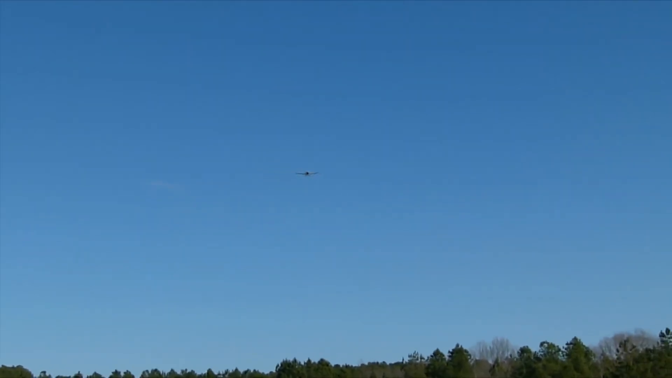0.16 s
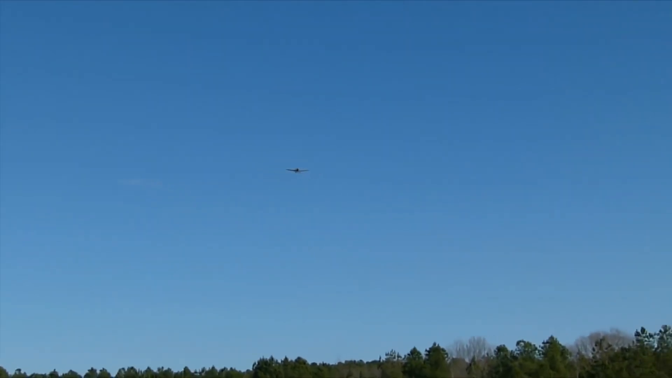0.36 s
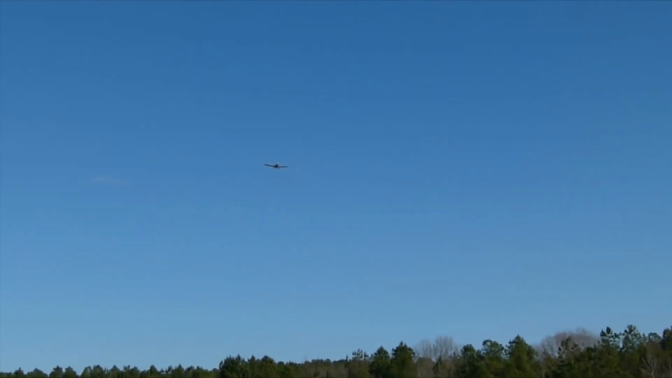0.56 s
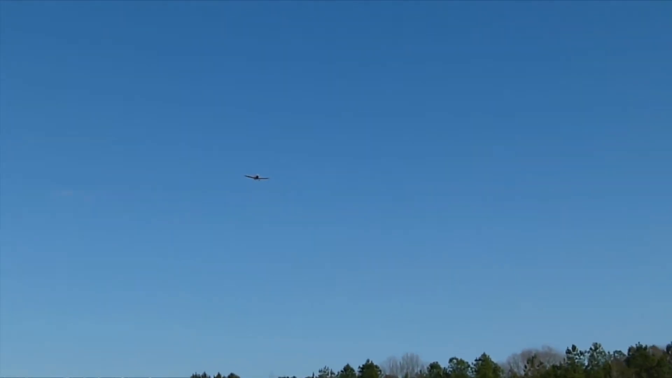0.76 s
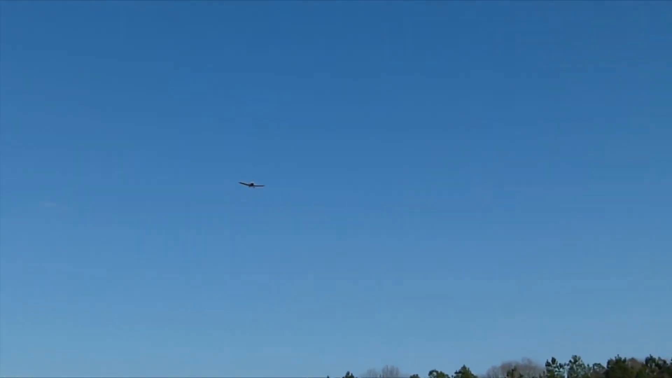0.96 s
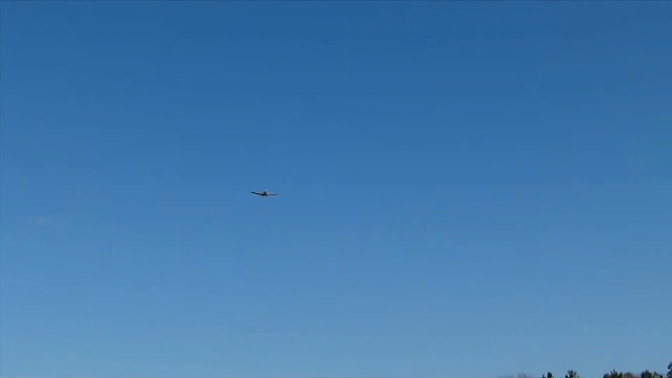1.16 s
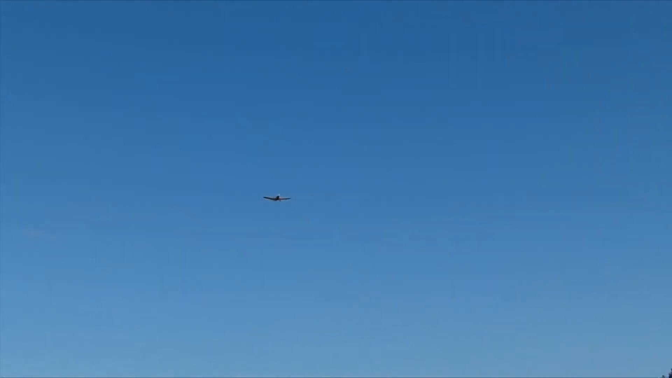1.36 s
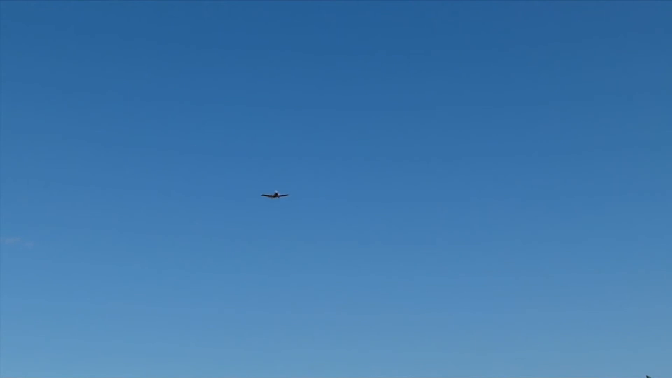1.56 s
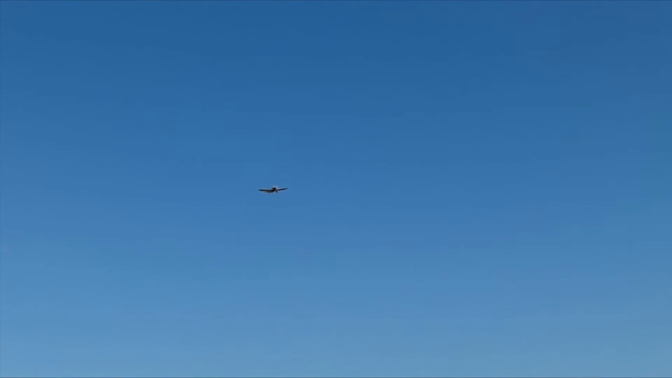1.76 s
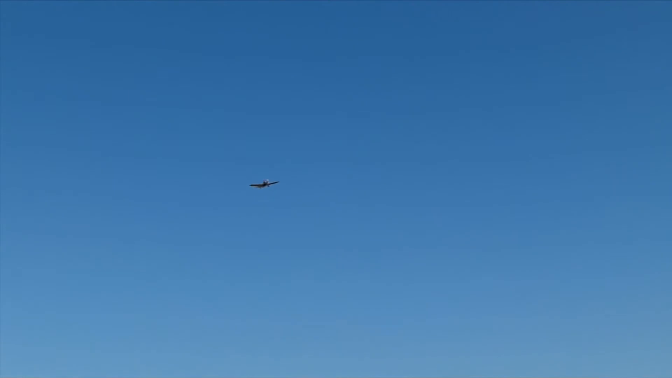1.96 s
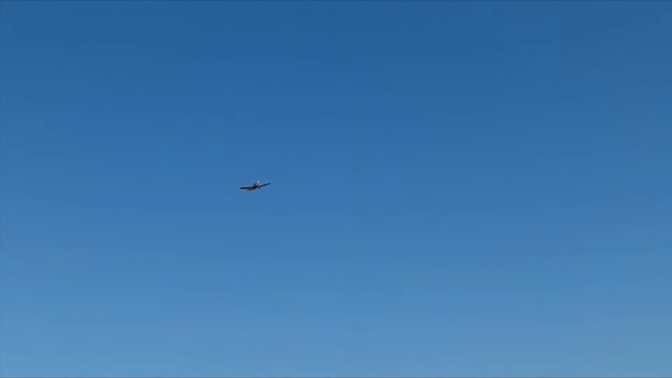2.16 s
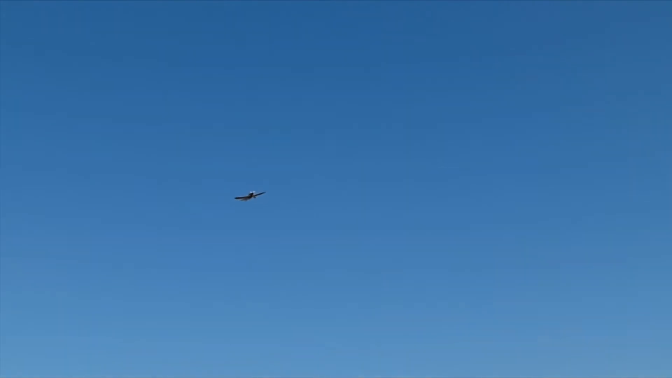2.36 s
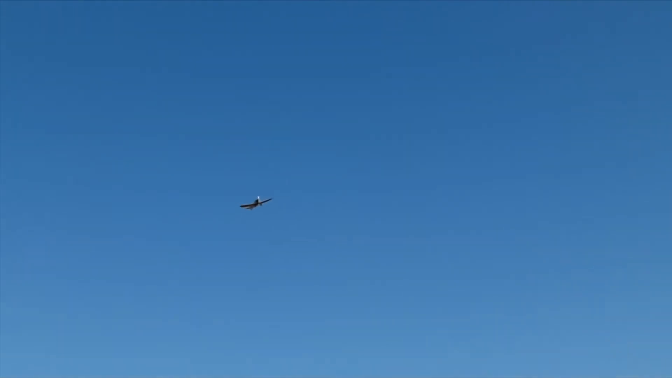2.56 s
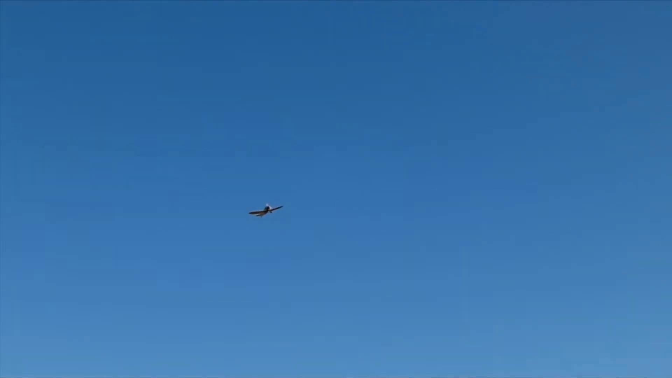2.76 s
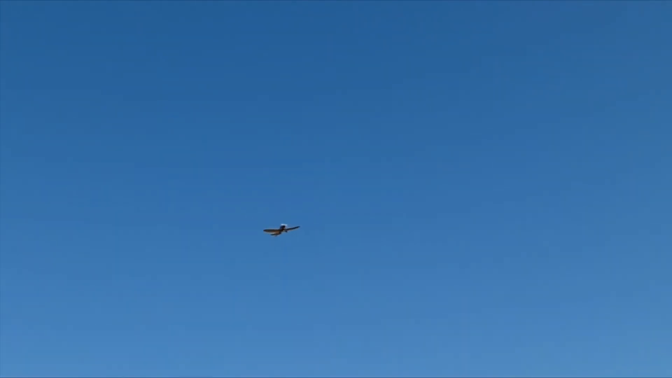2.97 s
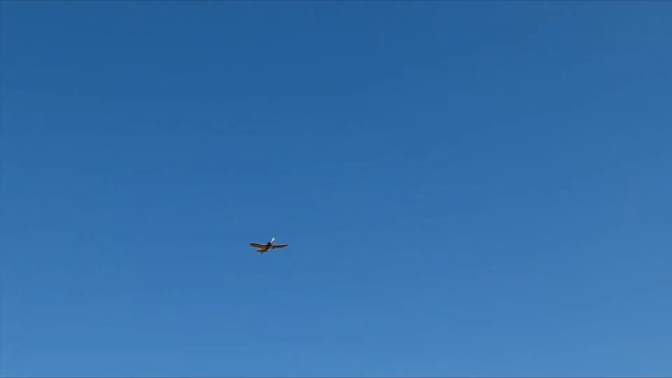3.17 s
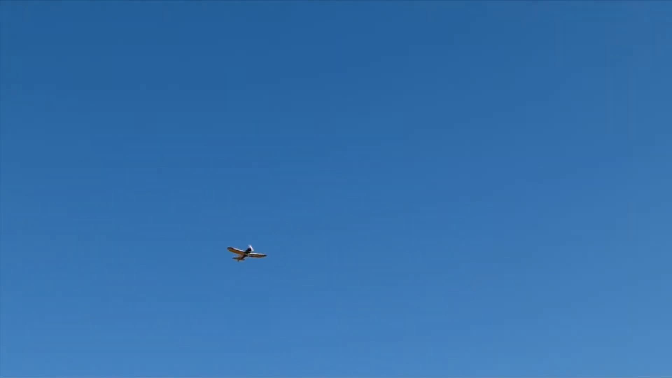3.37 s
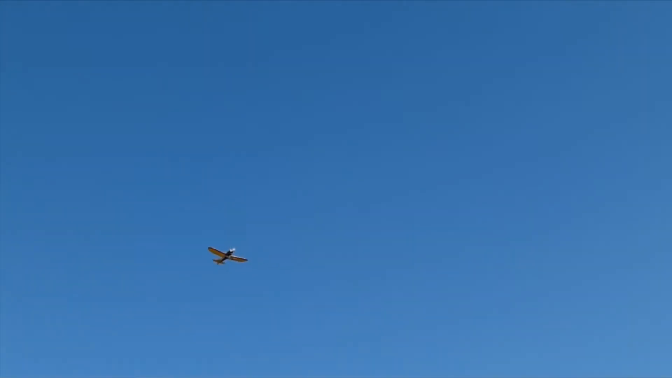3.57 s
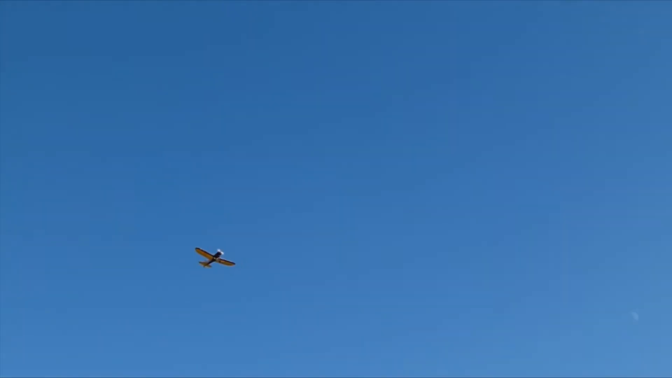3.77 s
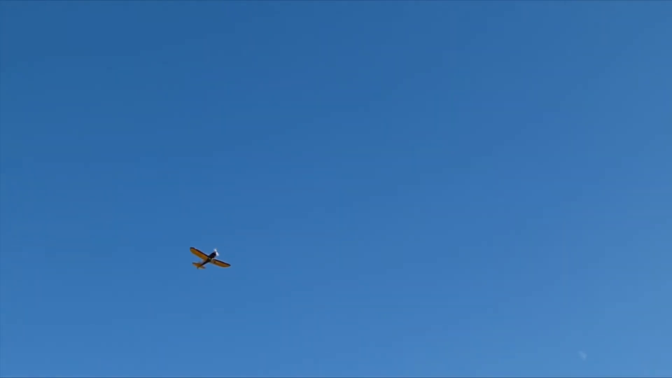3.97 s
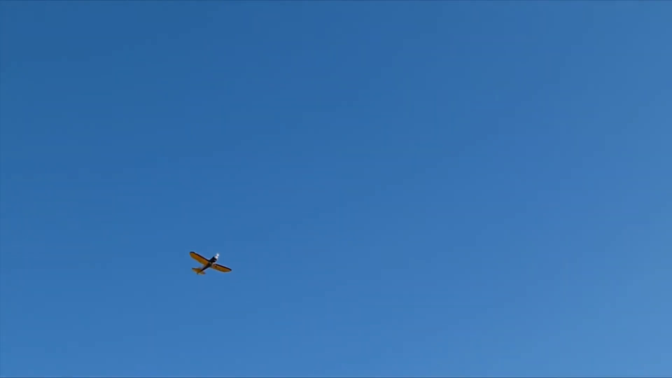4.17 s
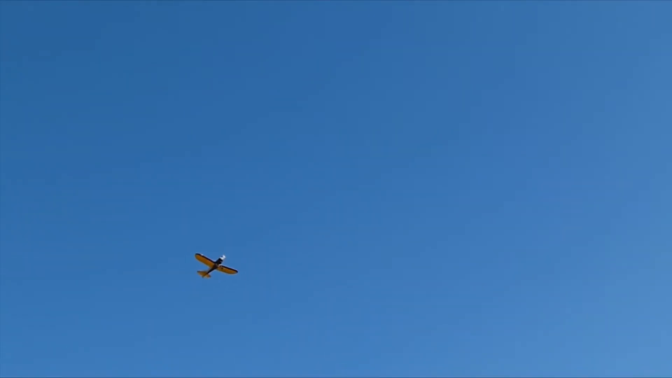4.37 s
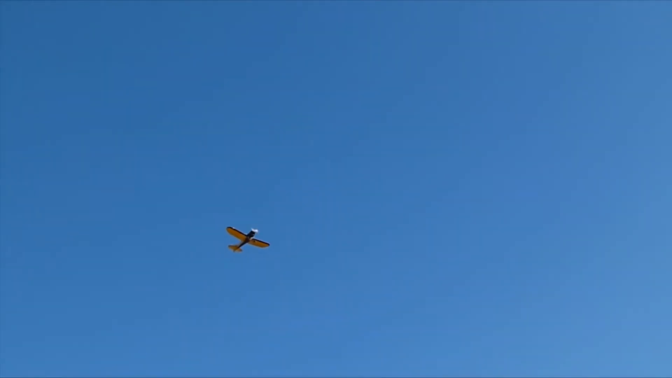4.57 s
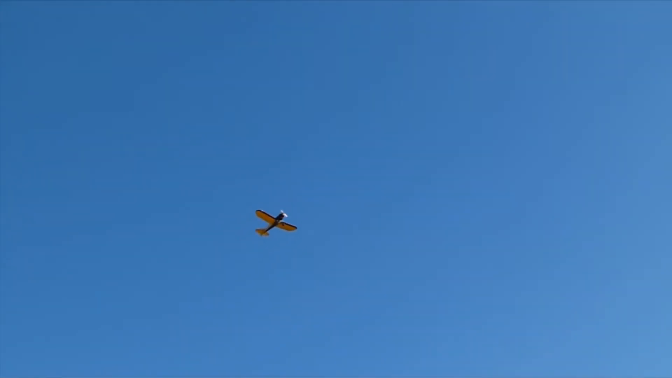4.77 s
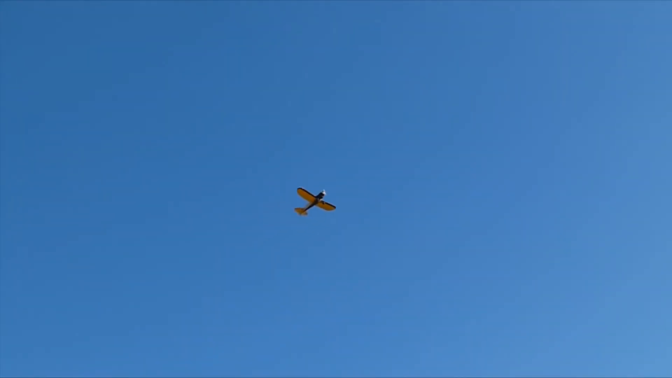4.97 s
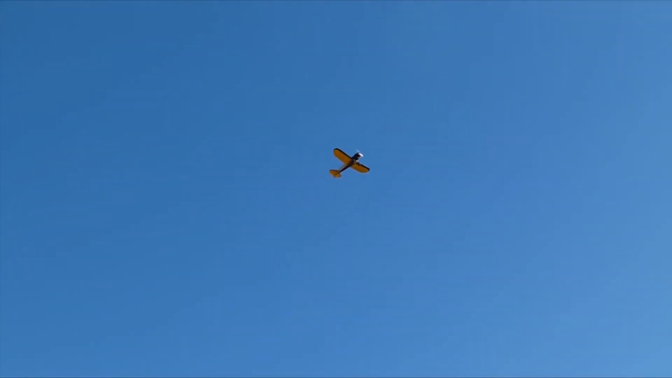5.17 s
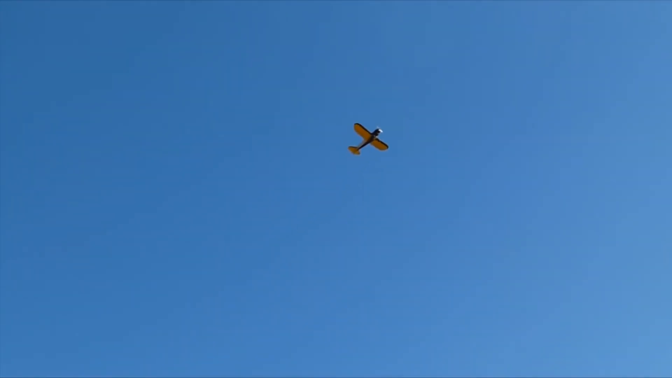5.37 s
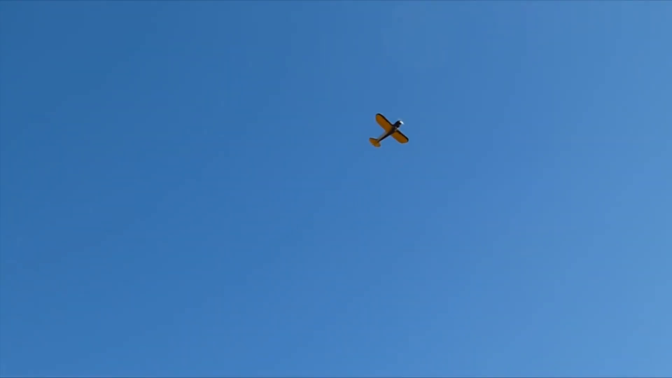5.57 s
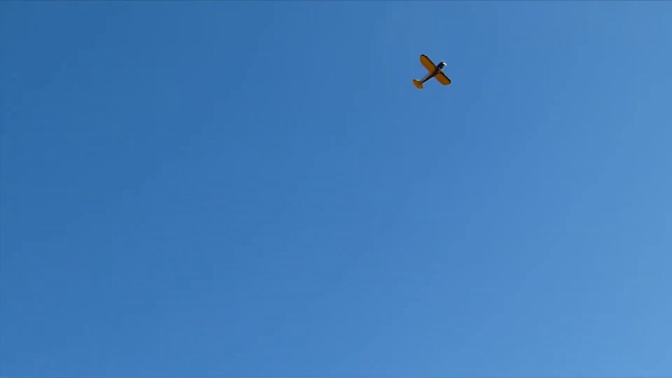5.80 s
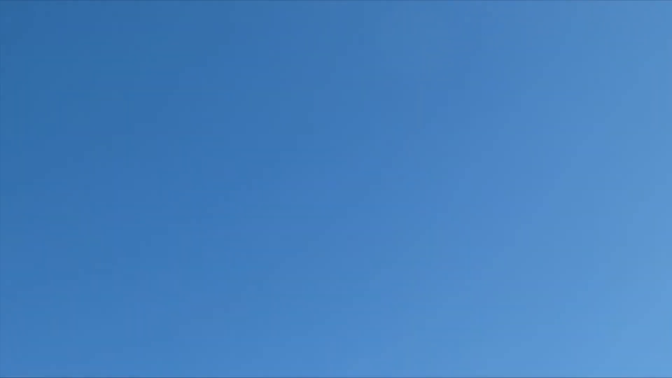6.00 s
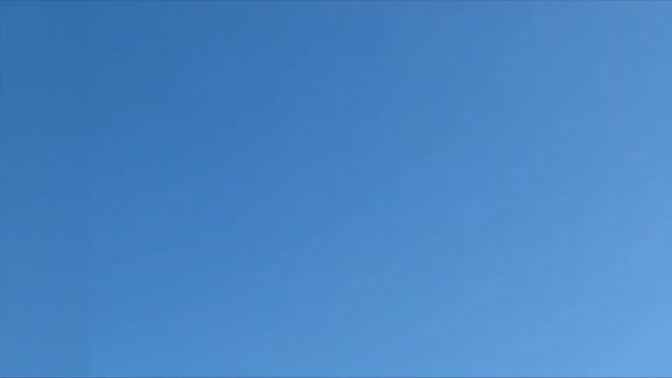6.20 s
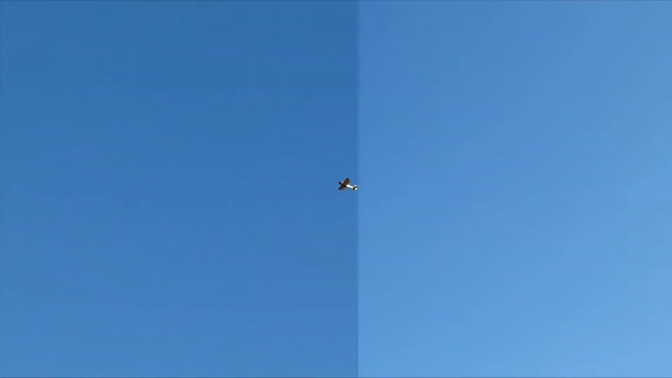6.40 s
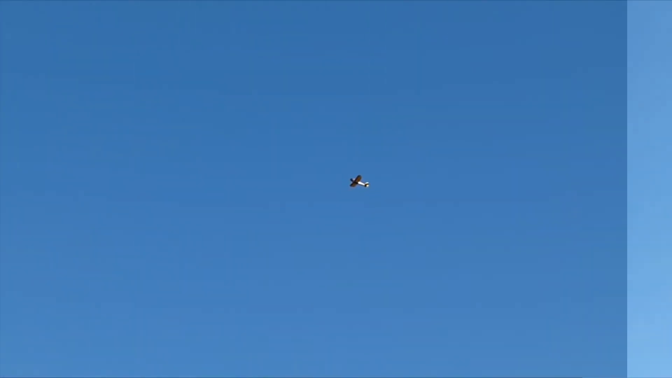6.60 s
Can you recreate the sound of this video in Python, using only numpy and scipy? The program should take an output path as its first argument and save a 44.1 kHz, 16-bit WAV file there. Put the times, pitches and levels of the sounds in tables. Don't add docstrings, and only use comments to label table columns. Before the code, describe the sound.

A model plane's small petrol engine buzzes continuously under open sky, growing from a thin far drone to a loud raspy one. Its tone wavers as direct sound and ground reflection mix. Tiny shell clicks appear before the middle, a gust thumps around five seconds, and the engine drops in pitch as it passes above. Several rough hand knocks end the take, close on the camera's stereo microphones.

```python
import sys
import numpy as np
from scipy import signal
from scipy.fft import rfft, irfft, next_fast_len
from scipy.io import wavfile
from scipy.ndimage import uniform_filter1d

SR = 44100
rng = np.random.default_rng(int(sys.argv[2]) if len(sys.argv) > 2 else 0)


def how_loud(loudness_db):
    steps = np.asarray(loudness_db, float) / 20
    return 10 ** steps


def wrap_up_sound(samples):
    columns = np.atleast_2d(samples).T
    tamed = np.clip(columns, -1, 1)
    steps = np.round(tamed * 32767).astype(np.int16)
    wavfile.write(sys.argv[1], SR, steps)


N = 292823
CONTROL = 64
SIDES = np.array([[0.5], [-0.5]])

# time_s, firings_hz
FIRING_RATE = [(0.0, 113.4), (0.4, 113.9), (0.85, 115.6), (1.15, 114.3), (1.45, 116), (1.75, 117.6),
               (2.05, 118), (2.45, 117.3), (2.8, 114.6), (3.2, 113.8), (4.0, 114.1), (4.3, 113.2),
               (4.62, 113.1), (5.05, 111.3), (5.22, 111.4), (5.5, 108.8), (6.1, 105.2), (6.64, 102.2)]
# time_s, low_orders_db
NEARNESS = [(0.0, -33.5), (0.26, -32), (0.44, -28.5), (1.1, -27.5), (1.4, -25.5), (2.05, -27), (2.6, -22),
            (2.9, -22), (3.09, -20), (3.73, -23.5), (3.93, -20.5), (4.18, -21), (4.28, -18.5),
            (4.97, -16.5), (5.03, -20), (5.38, -18), (5.95, -16.5), (6.64, -20)]
# time_s, left_right_db
BEARING = [(0, -0.5), (1, -0.4), (3.2, 0), (4.5, 0), (6.64, 0.1)]
START_TURNS = 0.2
FLUTTER_DB = 0.5

# multiple_of_firing_rate, direct_db, ground_path_db
PULSE = [(2, -13, -13), (3, -4.1, -3.2), (4, 1.5, 5.6), (5, -1.3, 2.4), (6, -1.1, -0.4), (7, 7.3, 1.1),
         (8, 4.6, -1.0), (9, 3.6, -4.5), (10, -5.4, -3.4), (11, -33.4, -2.4), (12, 1.1, -6.6),
         (13, -0.9, -14.5), (14, -52.5, -11.6), (15, -8.2, -38.5), (16, -28.9, -19.4), (17, -14.9, -29.2),
         (18, -15.7, -25.0), (19, -11.3, -23.3)]
# time_s, delay_ms, strength_db, direct_brightness_db_per_octave
GRASS_BOUNCE = [(0.0, 2.77, 1, 0), (0.4, 2.88, -4.5, -1), (0.85, 2.9, -4.5, -1), (1.3, 2.84, -6.5, -1.3),
                (1.75, 3.13, -7, -4), (2.1, 3.25, -3, -4), (2.5, 3.2, -7, -2.5), (2.85, 3.63, -9, -3),
                (3.2, 4.11, 4, -1.5), (3.6, 4.34, -1.5, -3), (4.0, 4.26, 2, -2), (4.3, 4.63, 3, -8.5),
                (4.6, 5.147, 2.5, -7), (4.9, 5.15, 3.5, -1.5), (5.2, 5.81, 2, -0.5), (5.5, 6.12, 6.5, 1),
                (5.9, 6.3, 10.5, 4.5), (6.64, 6.7, 11, 3.5)]
PATH_TURN, PATH_SPREAD = (1.83, 1.04), (-0.02, 0.022)
# time_s, order, level_db, length_s
ORDER_SWELLS = [(0.04, 5, 3.5, 0.19), (0.04, 16, -12.0, 0.15), (0.12, 9, -9, 0.2), (0.192, 15, -0.5, 0.54),
                (0.272, 8, -3.5, 0.64), (0.4, 14, 11.5, 0.12), (0.56, 17, -7, 0.65), (0.728, 11, 6.5, 0.85),
                (0.758, 10, 3, 0.51), (0.8, 7, 0.5, 0.86), (1.116, 4, -14, 0.59), (1.314, 14, -17, 0.14),
                (1.475, 16, -13, 0.22), (1.76, 10, 18, 0.12), (1.843, 9, 5, 0.7), (1.923, 6, 9.5, 0.17),
                (1.92, 8, -4.0, 0.36), (1.92, 15, -11, 0.19), (2.359, 5, -4.5, 0.22),
                (2.48, 10, -13.0, 0.45), (2.562, 14, 13.5, 0.41), (2.638, 11, 11, 0.32),
                (2.96, 12, -9.5, 0.1), (3.245, 7, 10.5, 0.086), (3.31, 11, -13, 0.079),
                (3.318, 16, -12.5, 0.45), (3.473, 5, 6, 0.2), (3.802, 8, 1.5, 1), (4.002, 6, -5.0, 0.97),
                (4.162, 9, 12.5, 0.21), (4.4, 10, -12, 0.15), (4.474, 11, -4.5, 0.51),
                (4.517, 14, -6.0, 0.33), (4.552, 15, 10, 0.49), (4.717, 9, -7.5, 0.52),
                (4.881, 10, 8.5, 0.19), (4.92, 7, -6, 0.62), (5.275, 5, 4, 0.29), (5.326, 12, 2.5, 0.75),
                (5.44, 9, -8.5, 0.78), (5.72, 14, 5.5, 0.54), (5.808, 13, -14, 0.4), (5.965, 8, 12.5, 0.67),
                (6.24, 3, -5, 0.4), (6.32, 10, 5, 0.9), (6.6, 9, -13, 0.11)]
# time_s, level_db
BLADE_TONE = [(0.0, -51), (1.2, -50.5), (1.45, -48), (2.3, -49.5), (2.6, -44.5), (3.8, -37), (4.35, -32),
              (5.2, -34), (5.65, -45), (6.64, -46.5)]
FIRST_DB, FIRST_GAIN_DB, FIRST_S, FIRST_RISE_S = -75, 15.5, 4.36, 0.3
WHINE_ORDER, WHINE_S, WHINE_LENGTH_S, WHINE_DB = 29, 4.76, 0.28, -38.5

# time_s,
# level_against_orders_db
ROAR_LEVEL = [(0, -8), (.6, -12.5), (1.2, -14), (1.8, -11.5), (2.6, -16), (3.2, -16), (3.8, -15.5),
              (4.5, -17), (5.0, -14), (5.4, -14.5), (5.9, -17.5), (6.12, -18), (6.22, -10.5), (6.4, -8),
              (6.64, -5.5)]
# pitch_hz, level_db
ROAR_COLOUR = [(120, -26.5), (200, -12), (300, -4), (800, 1), (1200, -0.5), (1600, -8), (2200, -6.5),
               (3500, -42)]

# from_hz, to_hz, ring_order (multiple of firing rate), half_width_orders,
# ring_over_hiss_ahead_db, ring_over_hiss_below_db, left_right_likeness (0-1)
TREBLE_RANGES = [
    (1750, 3100, 20.3, 1.6, 6, 1, .85),
    (3100, 4750, 35.6, 3.8, 4, 6, .9),
    (5100, 5900, 50.5, 2.5, -10, -14, .62),
    (6300, 8700, 71.8, 4.0, -12, 0, .4),
    (8900, 15600, 104.5, 3.0, -30, -30, .5),
]
# pitch_hz, level_db_per_hz
HISS_COLOUR = [(1700, -19.5), (1850, -55), (2250, -9.5), (2700, -10.5), (3200, -6.5), (3500, -3.5),
               (3950, 2), (4600, -8), (5600, -30), (6300, -27.5), (7900, -25.5), (9200, -42.5),
               (13000, -31.5), (14600, -48), (15600, -48)]
# level_db, share_of_nearness, share_of_eddies, gain_from_below_db
RANGE_LEVELS = [
    (-38.5, 0.6, 0.62, 3),
    (-36.5, 0.69, 0.99, -4.5),
    (-44.5, 0.23, 0.71, 4),
    (-59, 0.95, 0.87, 4.5),
    (-77.5, 0.26, 0.81, 14),
]
# time_s, focus_db, length_s, extra_per_higher_range_db
EDDIES = [(0.02, 1, 0.15, -3.5), (0.303, 5.5, 0.15, 2.5), (0.55, -2.5, 0.13, 0.5), (0.734, 6, 0.19, 0.5),
          (0.995, -8, 0.41, 1), (1.334, 4, 0.21, 2), (1.694, 0.5, 0.05, 1.5), (1.857, -1.5, 0.15, -1),
          (2.246, 2.5, 0.038, 2.5), (2.39, -1, 0.13, 0), (2.702, 6, 0.24, 0.5), (2.942, -10.5, 0.15, 2.5),
          (3.256, 6, 0.29, 2), (3.548, -3.5, 0.18, 1), (3.74, -10.5, 0.085, 4), (3.86, 6, 0.059, 2),
          (4.013, -4, 0.065, 2), (4.147, 4, 0.028, 1), (4.41, -11, 0.08, 1.5), (4.647, 8, 0.048, 1.5),
          (4.833, -1, 0.091, 3.5), (4.996, 9, 0.059, 0), (5.179, -14, 0.021, 3.5), (5.22, 6.5, 0.097, 1),
          (5.49, 0.5, 0.32, 0.5), (5.688, -6, 0.026, -2), (5.738, -2.5, 0.028, 3), (5.94, 1, 0.053, 2.5),
          (6.11, -4, 0.039, 5), (6.248, -11, 0.052, 4)]
# time_s, range (from 1), level_db, length_s
WISPS = [(0.027, 2, -8, 0.04), (0.021, 4, 9, 0.1), (0.076, 1, 2, 0.083), (0.316, 1, -3.5, 0.034),
         (0.36, 4, -8, 0.06), (0.42, 2, 2.5, 0.068), (0.522, 1, 4, 0.17), (0.56, 2, -6, 0.044),
         (0.72, 5, -3.5, 0.15), (0.763, 3, -3.5, 0.32), (0.82, 1, -4.5, 0.049), (0.948, 2, -1, 0.028),
         (0.98, 1, 3.5, 0.06), (1.32, 4, -10, 0.065), (1.563, 1, 3, 0.04), (1.7, 2, 2, 0.06),
         (1.78, 5, 2.5, 0.15), (1.84, 1, 3, 0.046), (1.833, 2, -6.5, 0.04), (1.96, 3, -2.5, 0.68),
         (1.985, 1, 1, 0.05), (2.017, 2, -5.5, 0.048), (2.302, 2, 2.5, 0.28), (2.32, 3, 6.0, 0.036),
         (2.7, 1, 0, 0.029), (2.86, 2, -1.5, 0.11), (3.06, 4, -9, 0.035), (3.09, 1, -2.5, 0.075),
         (3.196, 2, 1, 0.11), (3.48, 1, -9, 0.068), (3.5, 3, -1.5, 0.72), (4.103, 1, 3, 0.027),
         (4.1, 2, -6, 0.04), (4.432, 1, -8.5, 0.067), (4.757, 2, -3, 0.15), (4.907, 1, 1.5, 0.04),
         (5.084, 5, 7, 0.04), (5.257, 2, -4, 0.032), (5.253, 3, -5, 0.1), (5.26, 4, -6, 0.32),
         (5.595, 2, 5.5, 0.13), (5.7, 1, 0, 0.1), (5.97, 2, -5, 0.028), (6.0, 1, -2.5, 0.88),
         (6.04, 1, 3.5, 0.16), (6.14, 3, -3, 0.25), (6.38, 4, 6.5, 0.054), (6.397, 2, 0.5, 0.17),
         (6.555, 1, -2.0, 0.16)]
SHIMMER_DB, SHIMMER_HZ = 1.1, 20
BELOW_S, ROLL_S = 4, 0.24
BLAST_AHEAD, BLAST_BELOW, BLAST_TURNS = 0.9, 2.2, 0.26
PATCH_HZ = 9000
HOLD, HOLD_HZ = (0, 0.5, 0, 1, 0), 113
NARROW_S, NARROW = 1.9, 0.7
TWINKLE_DB, TWINKLE_S = 2.0, 0.08

# start_s, peak_db, pitch_hz, left_right_db
TICKS = [(2.729, -44, 6633, -6), (2.87, -41, 6288, -9), (3.018, -59, 7660, -12), (4.782, -51, 7596, -9),
         (4.9877, -33, 6164, -4), (5.1268, -23, 6780, -10.5), (5.132, -38.5, 8017, -12),
         (5.467, -42, 7700, -3.5), (6.2957, -23.5, 7216, -5), (6.357, -39, 7456, -19),
         (6.462, -51, 7585, -12), (6.518, -46, 7190, 11)]
# start_s, peak_db,
# pitch_hz
KNOCKS = [(3.8, -25, 3400), (4.965, -34, 190), (5.1268, -16, 4300), (5.132, -17, 3300), (5.378, -23, 4300),
          (5.597, -21, 3900), (5.607, -19, 3800), (5.83, -26, 4600), (6.09, -28, 301), (6.1975, -15, 900),
          (6.2055, -16, 1300), (6.2066, -8, 900), (6.21, -22.5, 290), (6.295, -21, 1050),
          (6.298, -15, 4100), (6.4615, -18, 2900), (6.465, -26, 250), (6.519, -15, 2000),
          (6.5195, -22, 3000), (6.5192, -12, 5200), (6.5424, -6.5, 1050), (6.544, -21, 303),
          (6.601, -18, 1400)]
SHELL_HZ = 11000

# time_s, level_over_calm_db, length_s
GUSTS = [
    (0.35, 8, 0.11),
    (0.629, 10.5, 0.11),
    (1.302, -10, 0.36),
    (1.744, 4, .15),
    (2.31, 16, .04),
    (4.533, 12, 0.12),
    (4.96, 44, 0.028),
    (5.5, -4, .6),
    (6.5, 16, .3),
]
# pitch_hz, level_db
BREEZE_COLOUR = [(25, -34), (60, -14.5), (100, -5.5), (180, 3), (400, -12), (1500, -20), (5000, -23),
                 (16000, -55.5)]
CALM_DB, LULL_DB, LULL_S = -58.5, -25.5, 1.6

# pitch_hz, left_lead_radians
PORT_LEAD = [(150, 0), (520, -.11), (900, -.5), (1350, -1.1), (1450, 1.1), (1900, .1), (2250, -.35),
             (3000, -.87), (4000, -1.3), (5300, -3.2), (8000, -3.5), (10500, -9.1), (15000, -10)]
# pitch_hz, left_right_db
PORT_TILT = [(60, 0.5), (99, 0.5), (160, 0.0), (270, -0.5), (450, -1.0), (740, -2.0), (1220, -0.5),
             (2010, 0.5), (3330, 0.5), (5500, 0.5), (9080, -4.0), (15000, -0.5)]


def engine():
    t = np.arange(N) / SR
    low_db = curves(NEARNESS, t)[0]
    turns = START_TURNS + np.cumsum(curves(FIRING_RATE, t)[0]) / SR
    slow, fast = drift(26, count=1)[0], drift(110, count=1)[0]

    flutter_db = FLUTTER_DB * evened(uniform_filter1d(slow, SR // 12))
    uneven_turns = turns + 0.001 * slow + 0.00018 * fast
    tone = how_loud(low_db + flutter_db) * orders(uneven_turns, curves(BLADE_TONE, t)[0] - low_db)

    first_db = FIRST_DB + FIRST_GAIN_DB * soft_step(FIRST_S, FIRST_RISE_S)
    tone += np.sqrt(2) * how_loud(first_db) * np.cos(2 * np.pi * turns)
    facing = np.exp(-((t - WHINE_S) / WHINE_LENGTH_S) ** 4)
    tone += how_loud(WHINE_DB) * facing * np.cos(2 * np.pi * WHINE_ORDER * turns)

    return tone + slipstream(low_db) + treble(turns + 0.002 * slow + 0.0013 * fast, fading(low_db))


def orders(turns, blades_db):
    t = np.arange(0, N, CONTROL) / SR
    hz = curves(FIRING_RATE, t)[0]
    k, direct_db, grass_db = np.transpose(PULSE)[:, :, None]
    delay_ms, bounce_db, bright_db = curves(GRASS_BOUNCE, t)
    direct, grass = (rung(k, db) * np.exp(1j * (turn + spread * (k - 8) ** 2))
                     for db, turn, spread in zip((direct_db, grass_db), PATH_TURN, PATH_SPREAD))

    size = direct * how_loud(bright_db * np.log2(k / 6))
    size = size + grass * how_loud(bounce_db) * np.exp(-2j * np.pi * k * hz * delay_ms / 1000)
    size *= how_loud((0.5 + 0.1 * k) * drift(6, count=len(k))[:, ::CONTROL])
    size /= np.sqrt((abs(size) ** 2).sum(0) / 2)

    s, order_at, swell_db, length_s = np.transpose(ORDER_SWELLS)
    size *= how_loud(bumps(s, length_s, swell_db * (k == np.round(order_at)))[:, ::CONTROL])
    size[0] = np.sqrt(2) * how_loud(blades_db[::CONTROL])
    size = uniform_filter1d(size.real, 3) + 1j * uniform_filter1d(size.imag, 3)
    size = np.repeat(size, CONTROL, 1)[:, :N]
    spin = np.exp(2j * np.pi * turns)
    return (np.polyval(size[::-1], spin) * spin ** 2).real


def rung(k, db):
    circle = np.interp(abs(np.fft.fftfreq(64, 1 / 64)), [0, *k[:, 0], 32], [-50, *db[:, 0], -40])
    return causal(circle)[k.astype(int)]


def slipstream(low_db):
    level_db = low_db + curves(ROAR_LEVEL, np.arange(N) / SR)[0]
    lumps = how_loud(1.6 * drift(40, count=1))
    return how_loud(level_db) * lumps * colour(noise(0.84), lambda f: read(ROAR_COLOUR, f))


def treble(turns, levels_db):
    out, below = 0, soft_step(BELOW_S, 0.44)
    blast = BLAST_AHEAD + (BLAST_BELOW - BLAST_AHEAD) * below
    echo = 0.13 * np.exp(-((turns - 0.45) % 1) / 0.1)
    gate = 1 + blast * np.exp(-(turns % 1) / BLAST_TURNS) + echo
    puffs = patchy(gate * noise(0), depth_db=1.1)

    for row, hold, db in zip(TREBLE_RANGES, HOLD, levels_db):
        lo_hz, hi_hz, order_at, width, ring_db, below_db, same = row

        def hiss_db(f):
            octaves_under = np.maximum(np.log2(lo_hz / (f + 1)), 0)
            octaves_over = np.maximum(np.log2(f / hi_hz + 1e-9), 0)
            return -120 * (octaves_under + octaves_over) + read(HISS_COLOUR, f)

        pair = np.array([puffs[0], same * puffs[0] + np.sqrt(abs(1 - same ** 2)) * puffs[1]])
        hiss = colour(pair, hiss_db)
        uneven_db = (1.5 + 1.8 * below) * drift(70, count=1)
        blows = how_loud(ring_db + (below_db - ring_db) * below + uneven_db)
        out = out + how_loud(db) * evened(blows * ring(turns, order_at, width, hold) + hiss)
    return out


def ring(turns, order_at, width, hold):
    near = np.arange(4, -6, -1)[:, None] + round(order_at + 2.4 * hold)
    nearer = soft_step(NARROW_S, 0.3)[::CONTROL]
    hz = curves(FIRING_RATE, np.arange(0, N, CONTROL) / SR)[0]
    order_at = order_at * (1 + hold * (HOLD_HZ / hz - 1))
    mode = 1 / (1 + 1j * (near - order_at + nearer) / (width * (1 - (1 - NARROW) * nearer))) ** 2
    twinkle = uniform_filter1d(rng.standard_normal(mode.shape), round(TWINKLE_S * SR / CONTROL))
    mode = mode * how_loud(TWINKLE_DB * evened(twinkle))
    mode = mode.astype(np.complex64).repeat(CONTROL, 1)[:, :N]
    spin = np.exp(2j * np.pi * turns)
    return evened((np.polyval(mode, spin) * np.exp(2j * np.pi * near[-1] * turns)).real)


def fading(low_db):
    base_db, near, eddy, below_db = np.transpose(RANGE_LEVELS)[:, :, None]
    rank = np.arange(len(RANGE_LEVELS))[:, None]
    s, focus_db, length_s, extra_db = np.transpose(EDDIES)
    air_db = eddy * bumps(s, length_s, focus_db) + 0.84 * rank * bumps(s, length_s, extra_db)
    air_db = air_db + SHIMMER_DB * drift(SHIMMER_HZ, count=len(RANGE_LEVELS))
    s, range_at, wisp_db, length_s = np.transpose(WISPS)
    air_db = air_db + bumps(s, length_s, wisp_db * (rank + 1 == np.round(range_at)))
    near_db = near * (uniform_filter1d(low_db, SR // 2) + 22)
    return base_db + near_db + below_db * soft_step(BELOW_S, ROLL_S) + air_db


def handling():
    out, t = np.zeros((2, N + 2000)), np.arange(2000) / SR
    dull = signal.butter(2, SHELL_HZ, fs=SR, output="sos")
    for s, db, hz, pan_db in TICKS:
        grit = rng.standard_normal(2000)
        tick = np.exp(-t / 0.0014) * (0.3 * np.sin(2 * np.pi * hz * t) + 0.7 * grit)
        tick = signal.sosfilt(dull, tick)
        out[:, round(s * SR):][:, :2000] += how_loud(db + 5.5 + pan_db * SIDES) * tick
    for s, db, hz in KNOCKS:
        cycles = t * hz
        swing = cycles * np.exp(1 - cycles / 0.6)
        out[:, round(s * SR):][:, :2000] += how_loud(db) * 1.9 * swing * np.sin(2 * np.pi * cycles)
    return signal.sosfilt(signal.butter(3, [170, 14000], "band", fs=SR, output="sos"), out[:, :N])


def breeze():
    s, gust_db, length_s = np.transpose(GUSTS)
    level_db = CALM_DB + LULL_DB * soft_step(LULL_S, 0.37)
    level_db = level_db + bumps(s, length_s, gust_db) + 3.6 * drift(17.0, count=1)
    return how_loud(level_db) * colour(noise(0.1), lambda f: read(BREEZE_COLOUR, f))


def microphone_hiss():
    return how_loud(-65) * patchy(noise(0.11), depth_db=2.5)


def noise(same):
    a, b = rng.standard_normal((2, N))
    same = np.clip(same, 0, 1)
    return np.array([a, same * a + np.sqrt(1 - same ** 2) * b])


def patchy(x, depth_db):
    hz, _, z = signal.stft(x, SR, nperseg=512)
    field = uniform_filter1d(rng.standard_normal(z.shape[1:]), 7, 0)
    field = evened(uniform_filter1d(field, 12, 1))
    deeper = 1 + np.minimum(hz[:, None] / PATCH_HZ, 1) ** 2
    return signal.istft(z * how_loud(depth_db * deeper * field), nperseg=512)[1][:, :N]


def colour(x, db_of_hz):
    gain = causal(db_of_hz(abs(np.fft.fftfreq(4096, 1 / SR))))
    return evened(signal.oaconvolve(x, np.fft.ifft(gain).real[None, :2048], axes=1)[:, :N])


def causal(db):
    return np.exp(np.conj(signal.hilbert(np.log(10) / 20 * np.maximum(db, -100))))


def drift(hz, count):
    t = np.arange(N) / SR
    knots = rng.standard_normal((count, 2000))
    return np.array([np.interp(t * hz, np.arange(len(k)), k) for k in knots]) * np.sqrt(3 / 2)


def soft_step(s, rise_s):
    return 0.5 + 0.5 * np.tanh((np.arange(N) / SR - s) / rise_s)


def bumps(s, length_s, db):
    bells = np.exp(-((np.arange(0, N, CONTROL) / SR - s[:, None]) / length_s[:, None]) ** 2)
    return (db @ bells).repeat(CONTROL, -1)[..., :N]


def curves(rows, t):
    s, *columns = np.transpose(rows)
    return [np.interp(t, s, c) for c in columns]


def read(points, hz):
    f, value = np.transpose(points)
    return np.interp(np.log(hz + 1), np.log(f + 1), value)


def evened(x):
    return x / np.sqrt(np.mean(abs(x) ** 2) + 1e-20)


def scene():
    bearing_db = curves(BEARING, np.arange(N) / SR)[0]
    return engine() * how_loud(bearing_db * SIDES) + handling() + breeze() + microphone_hiss()


def low_pass(x):
    return signal.sosfilt(signal.butter(12, 15720, fs=SR, output="sos"), x)


def record(dry):
    size = next_fast_len(N + 4096)
    hz = np.fft.rfftfreq(size, 1 / SR)
    ports = how_loud(SIDES * read(PORT_TILT, hz)) * np.exp(1j * SIDES * read(PORT_LEAD, hz))
    ports = ports / (1 + (hz / 15700) ** 60)
    ports = ports / (1 + (70 / (hz + 1)) ** 2)
    mix = irfft(rfft(dry, size) * ports, size)[:, :N]
    return low_pass(mix)


dry = scene()
out = record(dry)
wrap_up_sound(out)
```